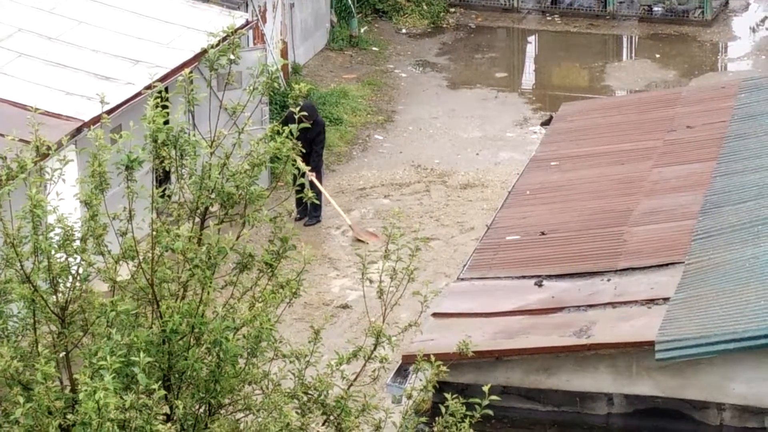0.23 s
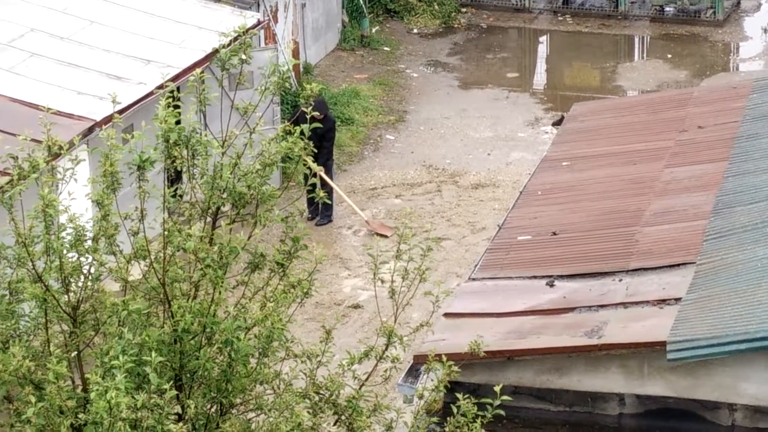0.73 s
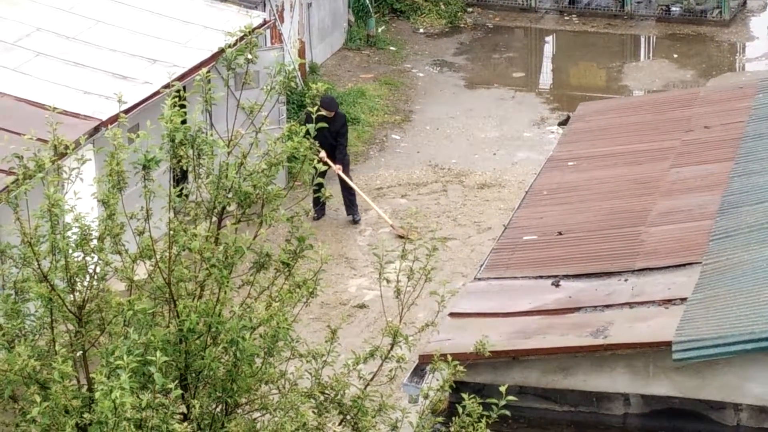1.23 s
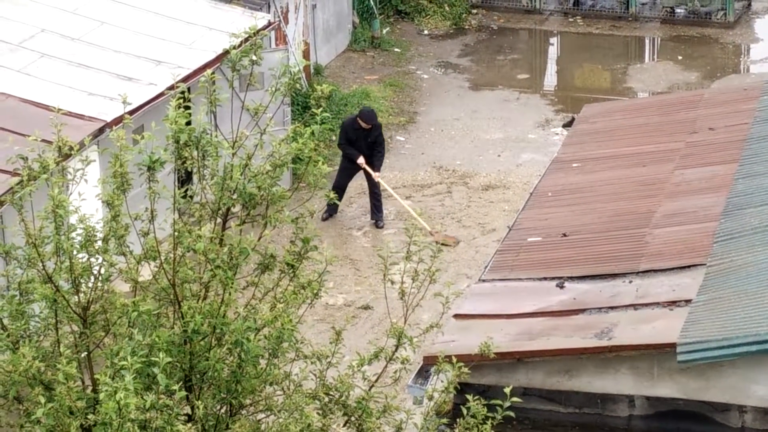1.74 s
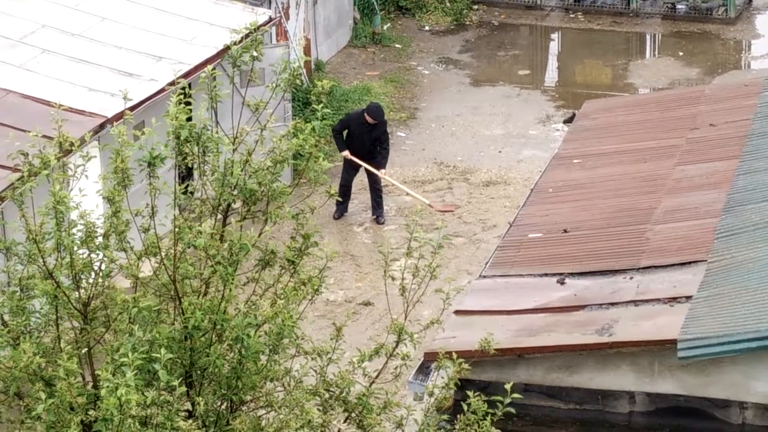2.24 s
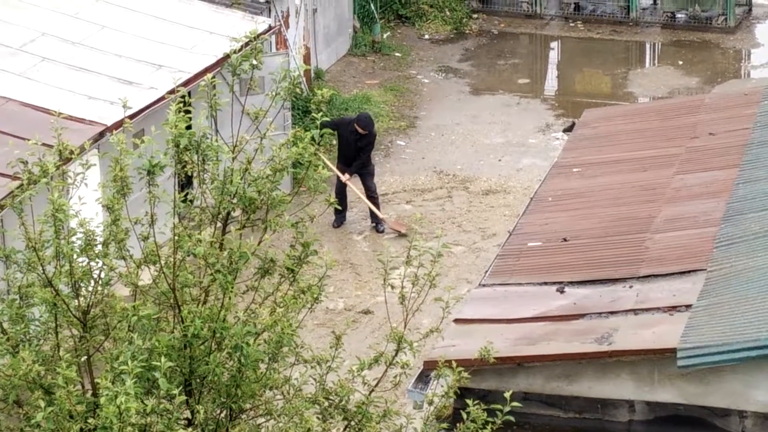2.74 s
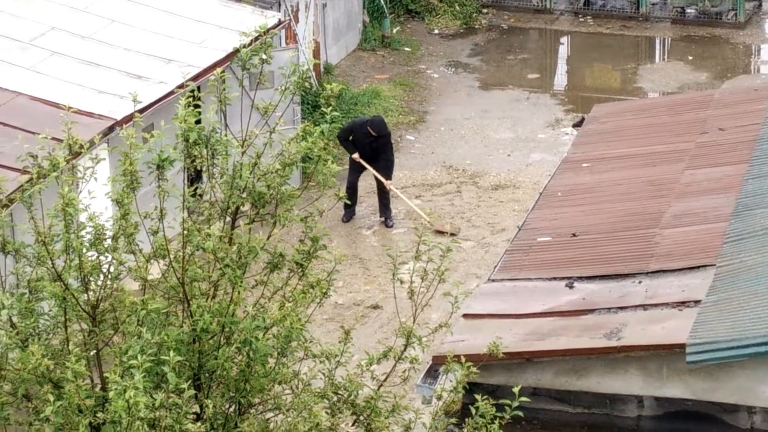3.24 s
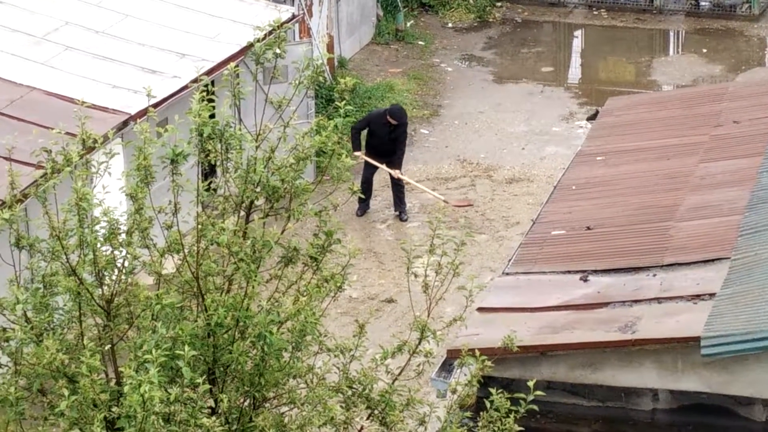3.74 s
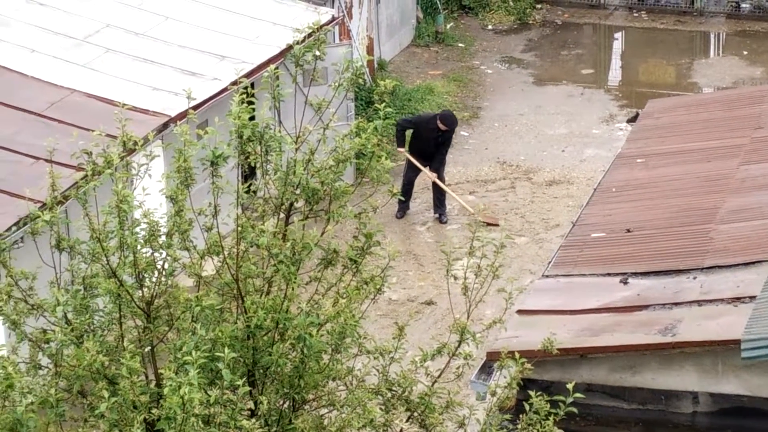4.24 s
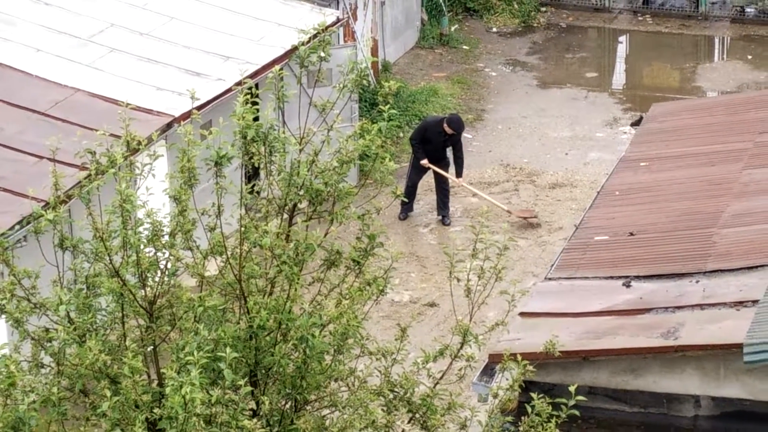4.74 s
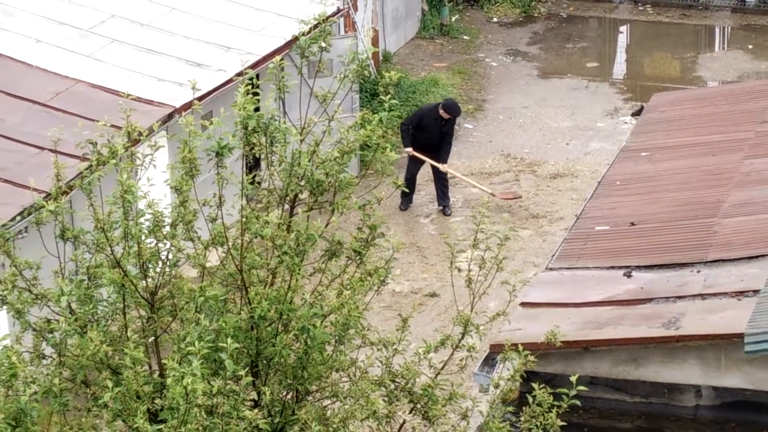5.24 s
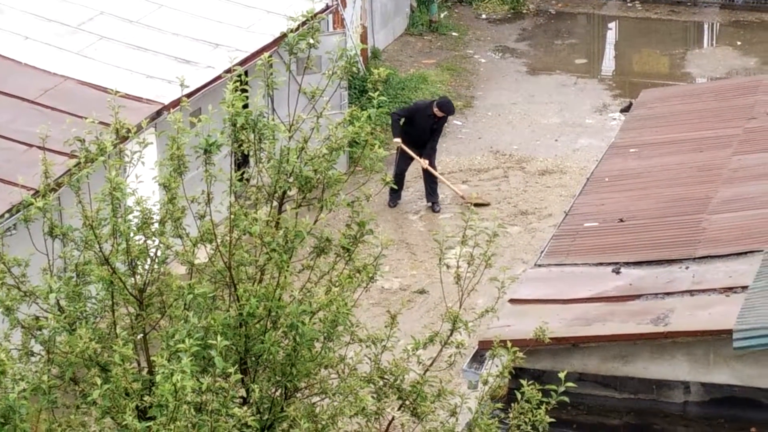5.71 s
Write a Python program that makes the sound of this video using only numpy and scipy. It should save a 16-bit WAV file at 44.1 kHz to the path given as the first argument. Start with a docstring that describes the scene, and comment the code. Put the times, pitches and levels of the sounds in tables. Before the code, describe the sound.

A stiff broom sweeps wet, sandy ground in a walled yard, heard from above with a light echo. Six short strokes start at about 0.1, 0.9, 1.5, 3.0, 4.3 and 5.7 seconds, each lasting up to half a second or so. Each is a bright, bristly scratch with coarse grit rolling underneath, and a light drag links the first few. Small wet scuffs from broom and shoes fall on and between the strokes, sharpest at 0.9 and 4.7 seconds. A pebble gives a tiny ping as the broom lands at 3 seconds.

A sparrow gives quiet two-note chirps at about 0.8, 2.3, 2.9, 3.5, 4 and 5 seconds, some distant and echoing, then two quick high ticks around 5.3 seconds. Throughout, an idling engine holds a low, slightly throbbing hum over far rumble and soft outdoor hiss.

```python
"""A walled yard, heard from above: a stiff broom is pushed six times over wet, sandy ground.
Bristle tips snap over the sand and roll coarse grit along; broom and shoes add small wet scuffs,
and one pebble pings. An engine idles out of sight and a sparrow repeats its chirp over far rumble
and hiss. The walls throw back the sweeping and the bird."""
import sys
import numpy as np
from scipy import signal
from scipy.fft import rfft, irfft, next_fast_len
from scipy.io import wavfile
from scipy.ndimage import uniform_filter1d

SR = 44100
rng = np.random.default_rng(int(sys.argv[2]) if len(sys.argv) > 2 else 0)


def unload_audio(sound):
    """Save the sound as a 16-bit wav file, at the path given as the first command line argument."""
    columns = np.transpose(np.atleast_2d(sound))
    # keep every value between -1 and 1, then stretch to whole-number steps
    steps = np.round(np.clip(columns, -1, 1) * 32767)
    wavfile.write(sys.argv[1], SR, steps.astype(np.int16))


N = 263277
TIME = np.arange(N) / SR

# broom strokes: (start [s], landing [s], build [s], ease [s], landing level [dB], hardest push [dB],
# lift-off level [dB], fade [dB/s], grit re bristles [dB], grit pitch [Hz])
STROKES = [(0.114, 0.016, 0.23, 0.13, -41, -36, -42.5, 140, -15, 970),
           (.9, 0.01, .025, 0.16, -40, -35, -40.5, 94, -9, 1270),
           (1.459, .19, 0.25, 0.051, -40.5, -38.5, -41, 260, -12.5, 950),
           (2.999, 0.016, .17, 0.19, -45, -38, -38.5, 300, -17, 1050),
           (4.297, 0.012, 0.092, 0.28, -49.5, -39, -42.5, 168, -13.5, 1250),
           (5.737, .02, 0.19, .04, -52, -36, -42, 200, -15, 1250)]


def broom(bite_s=.028, trail_end_s=1.38, trail_bristle_db=-56, trail_grit_db=-58.5):
    """The push of the arms drives bristles and grit; the head rings with them."""
    # head digs in briefly: (time [s], bristles [dB], grit [dB])
    bites = [(.36, -38.5, -64), (0.451, -47, -43.5), (.935, -40.5, -43.5), (1.755, -42, -47),
             (1.893, -39, -52), (3.29, -41.5, -46.5), (4.46, -45, -48), (5.937, -39, -62)]
    # head resonances: (frequency [Hz], width [Hz], lift [dB])
    head_modes = [(780, 80, 3), (1200, 130, 3.5), (2380, 280, 4), (3320, 240, 3.5)]
    # light drag of bristles and grit under the first two strokes
    trailing = uniform_filter1d(1. * (TIME < trail_end_s), size=2000)
    bristle_drive = amp(trail_bristle_db) * trailing
    grit_drive = amp(trail_grit_db) * trailing
    for *gesture, grit_db, _ in STROKES:
        force = push(*gesture)
        bristle_drive = np.hypot(bristle_drive, force)
        grit_drive = np.hypot(grit_drive, amp(grit_db) * force)
    for time_s, bristle_db, grit_db in bites:
        bite = np.exp(-((TIME - time_s) / bite_s) ** 2)
        bristle_drive = np.hypot(bristle_drive, amp(bristle_db) * bite)
        grit_drive = np.hypot(grit_drive, amp(grit_db) * bite)
    scrape = bristles(bristle_drive) + grit(grit_drive)
    return filtered(scrape, lambda hz: 1 + sum((amp(db) - 1) / (1 + 2j * (hz - mode_hz) / width_hz)
                                               for mode_hz, width_hz, db in head_modes))


def push(start_s, landing_s, build_s, ease_s, landing_db, hardest_db, lift_db, fade_db_per_s,
         jolt_db=3, jolt_s=.019):
    """Force of one stroke: the head's weight lands with a jolt; it is leant on, eased and lifted."""
    t = TIME - start_s
    corners_s = np.cumsum([landing_s, build_s, ease_s])
    db = np.interp(t, corners_s, [landing_db, hardest_db, lift_db])
    db -= fade_db_per_s * np.maximum(t - corners_s[-1], 0)
    db += jolt_db * np.exp(-((t - landing_s) / jolt_s) ** 2)
    return np.clip(t / landing_s, 0, 1) * amp(db)


def bristles(drive, gain_db=2.5, judder_db=.8, tuft_judder_db=1.2):
    """Tips catch and snap free; each tuft has its own pitch range and judders by itself."""
    # tips on sand: (frequency [Hz], spectral density [dB])
    spectrum = [(350, -22.5), (750, -21), (1200, -12.5), (1780, -8), (2150, -4.5), (2850, -5.5),
                (3600, -1.75), (5000, 1), (6700, -1.5), (8200, -9.5), (10000, -15.5), (12500, -23.5),
                (15500, -30)]
    snaps = coloured(patter(per_s=7000, spread_db=2.5, scatter_db=.5), spectrum)
    tuft_hz = np.geomspace(1200, 12000, 8)
    tufts = np.zeros((2, N))
    for band in np.eye(len(tuft_hz)):
        tuft = filtered(snaps, lambda hz: np.interp(hz, tuft_hz, band))
        tufts += tuft * amp(tuft_judder_db * wander(44))
    return drive * amp(gain_db + judder_db * wander(75)) * unit_rms(tufts)


def grit(drive, knock_cycles=4, clump_db=2, width_oct=.62):
    """Coarse grains roll in clumps, each a dull knock; pitch changes with the patch of ground."""
    t = np.arange(2048) / SR
    out = np.zeros((2, N))
    starts_s, *_, pitches_hz = np.transpose(STROKES)
    stroke = np.maximum(np.searchsorted(starts_s, TIME) - 1, 0)
    for hz in np.geomspace(700, 1500, 9):
        age = hz * t / knock_cycles
        knock = age * np.exp(-2 * age) * np.sin(2 * np.pi * hz * t)
        grains = patter(per_s=350, spread_db=1.5, scatter_db=2) * amp(clump_db * wander(24))
        weight = np.exp(-np.log2(hz / pitches_hz[stroke]) ** 2 / (2 * width_oct ** 2))
        out += weight * unit_rms(signal.oaconvolve(grains, knock[None], axes=1)[:, :N])
    return drive * unit_rms(out)


def scuffs():
    """Broom and shoes throw brief sprays of fine droplets and sand."""
    # wet slaps and scuffs: (time [s], level [dB], rise [s], decay [s])
    slaps = [(0, -51.5, .02, 0.24), (.122, -43, 0.014, .018), (.56, -49.5, 0.028, 0.1),
             (.904, -36.5, .003, 0.027), (2.235, -52, 0.027, 0.055), (3.011, -47, .002, 0.01),
             (3.745, -51, 0.018, 0.038), (4.727, -40, 0.0035, 0.017), (5.165, -53, .004, 0.018),
             (5.23, -59, .03, 0.058), (5.515, -45, 0.026, 0.032), (5.615, -59, .025, 0.037),
             (5.743, -44, .002, 0.015)]
    # spray: (frequency [Hz], spectral density [dB])
    spectrum = [(400, -33), (1500, 0), (5500, 8), (7500, 6.5), (10000, -4), (15500, -12)]
    envelope = np.zeros(N)
    for time_s, db, rise_s, decay_s in slaps:
        t = TIME - time_s
        envelope += amp(db) * np.clip(t / rise_s, 0, 1) * np.exp(-np.maximum(t - rise_s, 0) / decay_s)
    return envelope * coloured(patter(per_s=3800, spread_db=2.5, scatter_db=2), spectrum)


def patter(per_s, spread_db, scatter_db):
    """Ground snaps: some reach both microphone ports, others scatter off walls and roofs to one."""
    both, left, right = (clicks(per_s, spread_db) for _ in range(3))
    return direct(both) + amp(scatter_db) * np.array([left, right])


def clicks(per_s, spread_db):
    """Random snaps, most small, a few large."""
    size = amp(spread_db * np.minimum(rng.exponential(1, N), 4))
    return size * rng.choice([-1, 1], N) * (rng.random(N) < per_s / SR)


def pebble(time_s=3.012, hz=4950, db=-33, t60_s=.028):
    """A small stone pings as the broom lands on it."""
    t = np.arange(SR // 10) / SR
    out = np.zeros(N)
    add(out, time_s, amp(db - 60 * t / t60_s) * np.sin(2 * np.pi * hz * t))
    return direct(out)


def sparrow(tick_s=.0032, tick_top_hz=5800, tick_fall_hz=2000):
    """Two-note chirps, far ones mostly echo; ticks are very fast downward sweeps."""
    # chirps: (time [s], direct [dB], echo [dB])
    chirps = [(.81, -55, -66), (2.299, -68, -58.5), (2.928, -55, -61), (3.54, -81, -59.5),
              (3.982, -54, -60), (5.025, -52.5, -62)]
    # notes of a chirp: (offset [s], rise [s], fall [s], first [Hz], top [Hz], settled [Hz], gain [dB])
    notes = [(0, 0.0111, 0.03, 3763, 5450, 3820, 6), (.051, .018, 0.021, 3050, 4000, 3110, 4)]
    # tick notes: (time [s], level [dB])
    ticks = [(5.201, -42), (5.366, -44)]
    near, far = np.zeros((2, N))
    for time_s, direct_db, echo_db in chirps:
        for offset_s, *glide, db in notes:
            note = whistle(*glide)
            add(near, time_s + offset_s, amp(direct_db + db) * note)
            add(far, time_s + offset_s, amp(echo_db + db) * note)
    progress = np.arange(0, 1, 1 / (tick_s * SR))
    tick_hz = tick_top_hz - tick_fall_hz * progress
    tick = np.sqrt(2) * np.sin(np.pi * progress) * np.sin(2 * np.pi * np.cumsum(tick_hz) / SR)
    for time_s, db in ticks:
        add(near, time_s, amp(db) * tick)
        add(far, time_s, amp(db - 10) * tick)
    return amp(-2.5) * bounced(direct(near)) + echoes(far, t60_s=.77, delay_s=.004)


def whistle(rise_s, fall_s, first_hz, top_hz, settled_hz, settle_s=.009, quaver=.026, skew=1.14):
    """One quavering note: flicks up, sinks, and is loudest just past its middle."""
    t = np.arange(0, rise_s + fall_s, 1 / SR)
    rising_hz = first_hz + (top_hz - first_hz) * t / rise_s
    sinking_hz = settled_hz + (top_hz - settled_hz) * np.exp(-np.maximum(t - rise_s, 0) / settle_s)
    jitter = unit_rms(uniform_filter1d(rng.standard_normal(len(t)), size=60))
    hz = np.where(t < rise_s, rising_hz, sinking_hz) * (1 + quaver * jitter)
    envelope = np.sqrt(2 * abs(np.sin(np.pi * (t / (rise_s + fall_s)) ** skew)))
    return envelope * np.sin(2 * np.pi * np.cumsum(hz) / SR)


def engine(cycle_hz=7.372, throb_at_s=.074, drift_cycles=.012, scatter_rad=.3, waver_db=.5):
    """Idling four-stroke: one cylinder is stronger, so the exhaust throbs once a cycle."""
    # wavering deep drone, order 8: (time [s], level [dB])
    drone_levels = [(0.0, -44), (0.05, -43.5), (0.6, -48), (0.65, -45), (1.05, -49.5), (1.49, -45),
                    (2.56, -47.5), (2.76, -42), (2.89, -49.5), (3.27, -47), (4.89, -46.5), (5.97, -48)]
    # exhaust tones above it: (order [multiple of the cycle rate], level [dB])
    orders = [(12, -55.5), (16, -62), (18, -71.5), (19, -51), (20, -59), (24, -54.5), (25, -58), (27, -80),
              (28, -63), (32, -62), (33, -67), (48, -69), (92, -70.5)]
    cycles = cycle_hz * (TIME - throb_at_s) + drift_cycles * wander(1.6)
    drone_db = np.interp(TIME, *np.transpose(drone_levels)) - 2
    out = amp(drone_db) * np.cos(2 * np.pi * 8 * cycles)
    for order, db in orders:
        phase = 2 * np.pi * order * cycles + scatter_rad * rng.standard_normal()
        out += amp(db + waver_db * wander(5.3)) * np.cos(phase)
    return np.sqrt(2) * out


def air(level_db=-49, swell_db=.7):
    """Far rumble, alike at both ports, under a diffuse hiss."""
    # surroundings: (frequency [Hz], spectral density [dB])
    spectrum = [(20, -16), (29, -7), (40, -4), (65, -0.5), (105, -4), (200, -2.5), (330, -7.5),
                (520, -13.5), (700, -13), (1400, -18.5), (2900, -23), (4000, -20.5), (6500, -24),
                (7550, -22), (8000, -32), (11000, -40), (15300, -41)]
    # left-right likeness: (frequency [Hz], correlation [-1..1])
    likeness = [(60, 0.96), (140, 0.85), (290, 0.97), (640, 0.24), (1400, -0.031), (3100, 0.19),
                (7000, -0.033)]
    mid, side = (coloured(noise, spectrum) for noise in rng.standard_normal((2, N)))
    mid = filtered(mid, lambda hz: np.sqrt((1 + log_interp(likeness, hz)) / 2))
    side = filtered(side, lambda hz: np.sqrt((1 - log_interp(likeness, hz)) / 2))
    return amp(level_db + swell_db * wander(2.2)) * np.array([mid + side, mid - side])


def yard(x, near_db=-1.87, tail_db=-14):
    """Direct sound, near reflections and a weak tail between the walls."""
    return amp(near_db) * bounced(x) + amp(tail_db) * echoes(x[0], t60_s=.53, delay_s=.035)


def direct(x):
    """Sound from the yard reaches the right port two samples before the left."""
    return np.array([np.roll(x, 2), x])


def bounced(x, drift_s=.00004):
    """Adds near reflections whose paths shift a little as the source moves."""
    # off ground, walls and roofs: (delay [s], gain [dB])
    bounces = [(.00255, -15), (.0046, -16), (.0083, -15), (.019, -15)]
    out = x.copy()
    for delay_s, db in bounces:
        emitted_s = TIME - delay_s - drift_s * wander(1.35)
        out += amp(db) * np.array([np.interp(emitted_s, TIME, port, left=0) for port in x])
    return out


def echoes(x, t60_s, delay_s, taps_per_s=2000):
    """Sparse decaying reflections, different at each port."""
    t = np.arange(SR) / SR
    taps = rng.standard_normal((2, SR)) * (rng.random((2, SR)) < taps_per_s / SR)
    taps *= amp(-60 * t / t60_s)
    taps /= np.linalg.norm(taps, axis=1, keepdims=True)
    taps = np.pad(taps, ((0, 0), (round(delay_s * SR), 0)))
    return signal.fftconvolve(x[None], taps, axes=1)[:, :N]


def amp(db):
    """Decibels to gain."""
    return 10 ** (np.asarray(db) / 20)


def unit_rms(x):
    """Scales to rms 1."""
    return x / np.sqrt(np.mean(x ** 2) + 1e-20)


def log_interp(points, hz):
    """Reads a table on a log-frequency axis."""
    points_hz, values = np.transpose(points)
    return np.interp(np.log(hz + 1), np.log(points_hz + 1), values)


def filtered(x, gain_at):
    """Filters by a gain given as a function of frequency."""
    size = next_fast_len(N + 4096, True)
    return irfft(rfft(x, size) * gain_at(np.fft.rfftfreq(size, 1 / SR)), size)[..., :N]


def coloured(x, spectrum):
    """Shapes x by a spectrum, at rms 1."""
    return unit_rms(filtered(x, lambda hz: amp(log_interp(spectrum, hz))))


def wander(rate_hz):
    """Smooth random drift up to about rate_hz, at rms 1."""
    return unit_rms(filtered(rng.standard_normal(N), lambda hz: np.exp(-(hz / rate_hz) ** 2)))


def add(mix, time_s, sound):
    """Mixes a sound in at time_s."""
    part = mix[round(time_s * SR):][:len(sound)]
    part += sound[:len(part)]


def scene():
    """Sweeping in the yard, with bird, engine and open air around it."""
    return yard(broom() + scuffs() + pebble()) + sparrow() + engine() + air()


def record(dry, cutoff_hz=15850):
    """Colour of the two microphone ports, then the band limit."""
    # port imbalance: (frequency [Hz], left minus right [dB])
    imbalance = [(60, -0.5), (800, -1.1), (2500, -0.7), (4200, 2.5), (6100, 7.5), (8200, 0), (11000, -5.5),
                 (15000, -6)]
    heard = filtered(dry, lambda hz: amp(np.outer([.5, -.5], log_interp(imbalance, hz))))
    lowpass = signal.firwin(511, cutoff_hz, window=("kaiser", 9), fs=SR)
    return signal.oaconvolve(heard, lowpass[None], "same")


dry = scene()
out = record(dry)
unload_audio(out)
```